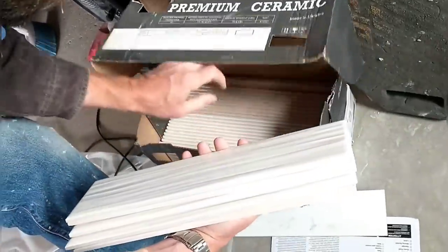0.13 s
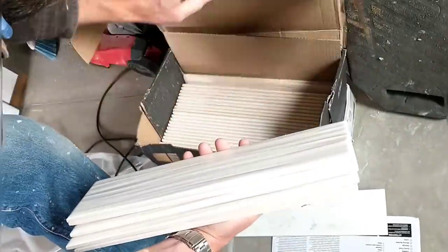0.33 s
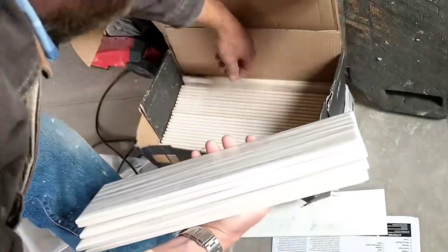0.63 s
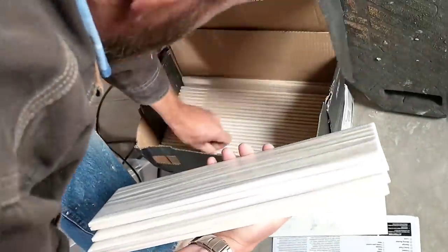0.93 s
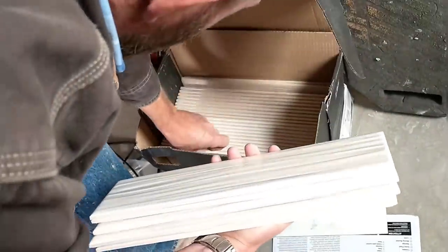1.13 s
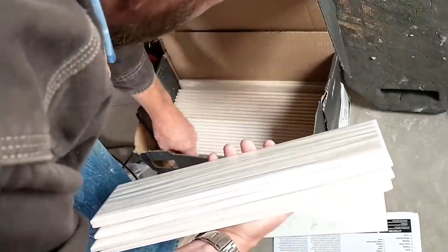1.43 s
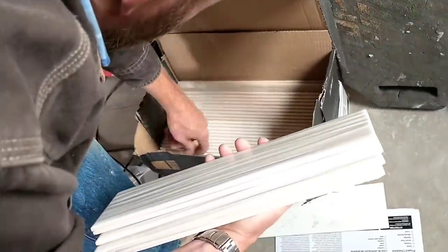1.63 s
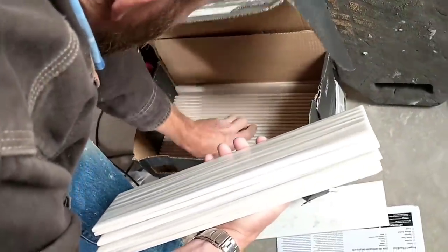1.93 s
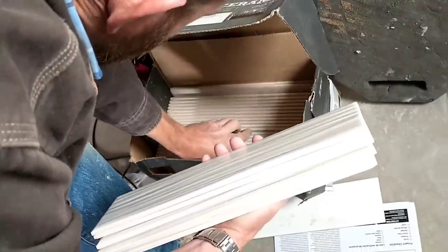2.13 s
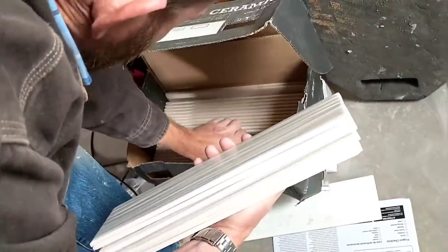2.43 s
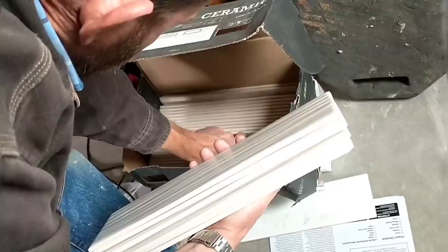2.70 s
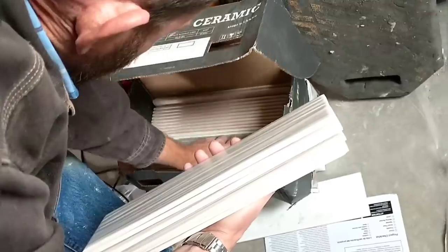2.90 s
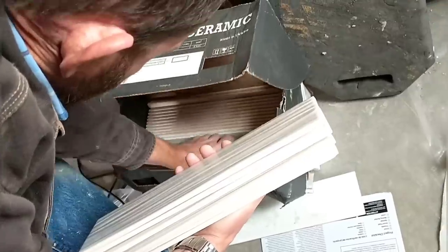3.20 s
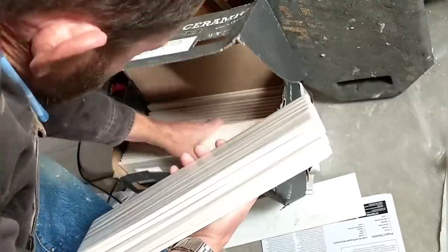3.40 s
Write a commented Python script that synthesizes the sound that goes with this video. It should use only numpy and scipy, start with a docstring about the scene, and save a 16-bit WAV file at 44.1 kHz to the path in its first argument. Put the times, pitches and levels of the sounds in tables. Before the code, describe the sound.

Stacked ceramic tiles clink and scrape close to the microphone in a quiet small room. A cardboard lid flips open and creaks, a sleeve brushes the box, then tile edges click before a bundle knocks and slides out grittily.

```python
"""Ceramic tiles are taken from a cardboard box in a small room with a faint hush.
First the lid flips open with a snap and its folds creak; a hand and sleeve brush and bump the hollow box.
From 2 s tile grinds on tile, and from 2.6 s the edges click and chatter, ringing the stack.
Near 3.2 s a bundle knocks against the stack, then slides out with a gritty, squeaking scrape."""
import sys
import numpy as np
from scipy import signal
from scipy.fft import rfft, irfft
from scipy.io import wavfile

SR = 44100
rng = np.random.default_rng(int(sys.argv[2]) if len(sys.argv) > 2 else 0)


def dump(signal):
    """Clip the signal to [-1, 1] and save it as 16-bit WAV at the path in sys.argv[1]."""
    limited = np.clip(np.atleast_2d(signal).T, -1, 1)
    pcm = np.round(limited * 32767).astype(np.int16)
    wavfile.write(sys.argv[1], SR, pcm)


N = 156555
T = np.arange(N) / SR


def from_db(db):
    """Decibels to gain."""
    return 10 ** (np.asarray(db) / 20)


def colour(x, points, tilt_db=0):
    """Minimum-phase filter from (Hz, dB) points plus a tilt per octave; unity noise gain."""
    hz, db = np.transpose(points)
    octaves = np.log2(np.maximum(np.fft.rfftfreq(8192, 1 / SR), 1))
    gain = from_db(np.interp(octaves, np.log2(hz), db) + tilt_db * np.maximum(octaves, np.log2(hz[0])))
    cepstrum = irfft(np.log(gain / np.sqrt(np.mean(gain ** 2))))
    half = len(cepstrum) // 2
    cepstrum[1:half] *= 2
    cepstrum[half + 1:] = 0
    response = irfft(np.exp(rfft(cepstrum)))[None, :half]
    return signal.fftconvolve(np.atleast_2d(x), response, axes=1)[:, :N]


def butter(x, hz, kind="low", order=2):
    """Butterworth low- or high-pass."""
    return signal.sosfilt(signal.butter(order, min(hz, SR / 2 - 1), kind, fs=SR, output="sos"), x)


def resonate(x, modes):
    """Parallel resonances; about unity noise gain."""
    out, power = 0, 0
    for hz, width_hz, db in modes:
        r = np.exp(-np.pi * width_hz / SR)
        b = from_db(db) * (1 - r * r) / 2
        poles = [1, -2 * r * np.cos(2 * np.pi * hz / SR), r * r]
        out = out + signal.lfilter([b, 0, -b], poles, x + 1e-18)
        power += from_db(db) ** 2 * (1 - r)
    return out / np.sqrt(power)


def spread(pair, split_hz=722, bass_side_db=-20):
    """Two unrelated signals to left and right: alike in the bass, unlike in the treble."""
    side = butter(pair[1], split_hz, "high") + from_db(bass_side_db) * butter(pair[1], split_hz, order=1)
    mid = pair[0] + (np.sqrt(2) - 1) * butter(pair[0], split_hz, order=1)
    return np.array([mid + side, mid - side]) / np.sqrt(2)


def grains(per_s, spread_db):
    """Random micro-contacts of uneven size; stereo, rms 1."""
    sizes = from_db(spread_db * np.minimum(rng.exponential(1, N), 4))
    pulses = (rng.random(N) < per_s / SR) * sizes * rng.choice([-1, 1], (2, N))
    stereo = spread(np.array([pulses[0], np.roll(pulses[1], 1)]))
    return stereo / stereo.std()


def friction(judder_hz=43.3, judder_db=2):
    """Two surfaces rub under wavering pressure; rms 1."""
    waver = butter(rng.standard_normal(N + SR), judder_hz)[SR:]
    rub = grains(per_s=6000, spread_db=3.2) * from_db(judder_db * waver / waver.std())
    return rub / rub.std()


def swell(start_s, rise_s, hold_s, fall_s, db):
    """Envelope of one movement: linear rise, hold, then -20 dB per fall_s."""
    falling_s = np.maximum(T - start_s - rise_s - hold_s, 0)
    return from_db(db - 20 * falling_s / fall_s) * np.clip((T - start_s) / rise_s, 0, 1)


def impulse(time_s, db):
    """One-sample blow."""
    return from_db(db) * (np.arange(N) == int(time_s * SR)) + 1e-18


def contact(time_s, db, decay_s, rise_s=0.00072, tick_db=4.5, crunch_db=1):
    """Two edges meet: a crunch builds to a sharp tick and dies away."""
    t = T[:SR // 8]
    burst = spread(rng.choice([-1., 1.], (2, len(t)))) * np.minimum(t / rise_s, 1) * np.exp(-t / decay_s)
    crunch = np.pad(burst, ((0, 0), (int(time_s * SR), N)))[:, :N]
    return impulse(time_s + rise_s, db + tick_db) + from_db(db + crunch_db) * crunch


# Room noise spectrum: (frequency [Hz], gain [dB])
HUSH_SPECTRUM = [(18, -29.5), (30, -0.5), (1220, -10), (3220, -19), (4300, -12), (7090, -19), (16000, -22)]


def hush(level_db=-70.5):
    """Steady, bass-heavy room noise."""
    noise = colour(spread(rng.standard_normal((2, N))), HUSH_SPECTRUM)
    return from_db(level_db) * butter(noise, 63.7, "high")


def room(x, low_t60_s=0.2884, treble_t60_s=0.2293, gap_s=0.003017, level_db=-2.5):
    """Dense reflections from floor and walls; the treble dies first."""
    t = T[:SR // 2]
    noise = spread(rng.standard_normal((2, len(t)))) * (t > gap_s)
    low = butter(noise, 3700, order=1)
    tail = low * from_db(-60 * t / low_t60_s) + (noise - low) * from_db(-60 * t / treble_t60_s)
    tail = butter(tail / np.sqrt(np.sum(tail ** 2) / 2), 253, "high")
    return from_db(level_db) * signal.fftconvolve(x, tail, axes=1)[:, :N]


# Hand, sleeve or bundle on the box:
# (time [s], rise [s], hold [s], 20 dB fall [s], boom [dB], rasp [dB], cloth [dB])
STROKES = [(0, 0.00156, 0.0395, 0.0679, -46, -51.5, -78.5), (0.107, 0.0161, 0.0196, 0.1174, -54, -54, -62),
           (0.247, 0.0178, 0.029, .3, -68.5, -69.5, -69.5),
           (0.418, 0.0448, 0.0124, 0.2748, -63.5, -73, -62.5),
           (0.579, 0.0082, 0.0683, 0.01, -50, -51, -57.5),
           (0.686, 0.01344, 0.0311, 0.0919, -41.5, -48.5, -52.5),
           (0.832, 0.0914, 0.131, 0.23, -60, -61, -61.5), (1.078, 0.0293, 0.0667, 0.282, -64, -68, -91.5),
           (1.54, 0.0324, .025, 0.0437, -55, -56, -57.5),
           (1.599, 0.0143, 0.0205, 0.1169, -49.5, -52.5, -62.5),
           (3.17, 0.034, 0.085, 0.11, -48.5, -51.5, -66.5)]
# Hand bumps: (time [s], level [dB])
BUMPS = [(.010, -13), (.417, -18.5), (.583, -18.5), (.678, -8), (.704, -5), (1.623, -11.5), (1.656, -18)]
# Hollow box: (frequency [Hz], width [Hz], gain [dB])
BOX_MODES = [(78.4, 8.34, -8), (120, 13.9, -9.5), (152.3, 11.9, 6), (198.5, 19.6, -11), (269.5, 38.2, -13),
             (337, 37.4, -12), (543.5, 76, -21.5)]
# Wall rasp and sleeve hiss: (frequency [Hz], gain [dB])
RASP_SPECTRUM = [(100, -12), (350, 0.5), (500, -1), (700, -1.5), (1000, -5.5), (1250, 2.5), (1550, -3.5),
                 (1900, -2.5), (2600, -13), (4300, -17.5), (7000, -26.5), (16000, -45)]
CLOTH_SPECTRUM = [(500, -21.5), (2500, -7), (4300, -2), (6500, -0.5), (9000, 1), (12000, 1), (14200, 3),
                  (16000, 2.5)]


def brushing(soft_hand_hz=166, radiation_hz=56.4):
    """Bumps and strokes boom in the box; strokes also rasp on its wall and hiss in the sleeve."""
    boom, rasp, cloth = (sum(swell(*row[:4], row[column]) for row in STROKES) for column in (4, 5, 6))
    bumps = butter(sum(impulse(*bump) for bump in BUMPS), soft_hand_hz)
    wall = resonate(bumps + boom * friction(), BOX_MODES)
    wall += colour(rasp * grains(per_s=6000, spread_db=3), RASP_SPECTRUM)
    sleeve = colour(cloth * grains(per_s=12000, spread_db=3.5), CLOTH_SPECTRUM)
    return butter(wall, radiation_hz, "high", order=4) + sleeve


# Cuff strokes: (time [s], rise [s], hold [s], 20 dB fall [s], level [dB])
CUFF_STROKES = [(0.691, 0.0097, 0.0147, .07, -54)]
# Cuff hiss: (frequency [Hz], gain [dB])
CUFF_SPECTRUM = [(2000, -30), (9000, -15.5), (12500, -4), (14500, 1), (16000, 3)]


def cuff():
    """The cuff whisks over the flap."""
    envelope = sum(swell(*stroke) for stroke in CUFF_STROKES)
    return colour(envelope * grains(per_s=12000, spread_db=3.5), CUFF_SPECTRUM)


# Fold creaks: (time [s], hold [s], frequency [Hz], width [Hz], level [dB], fade [dB/s])
CREAKS = [(0.0085, 0.083, 1629, 104, -54, 20), (0.1603, 0.27, 1656, 89, -54.5, 67.5),
          (.582, 0.069, 789, 34.4, -45, 80), (0.44, 0.0287, 672, 210, -61.5, 201)]


def creaks():
    """Cardboard folds creak: tiny slips drive one resonance each."""
    out = 0
    for time_s, hold_s, hz, width_hz, db, fade_db_per_s in CREAKS:
        fade = from_db(-fade_db_per_s * np.maximum(T - time_s, 0))
        envelope = swell(time_s, 0.0051, hold_s, 0.03, db) * fade
        out += resonate(envelope * grains(per_s=900, spread_db=1.5), [(hz, width_hz, 0)])
    return out


# Wall taps: (time [s], level [dB], decay [s], tilt [dB/octave])
TAPS = [(0.062, -45.5, .0033, -6.5), (1.433, -48.5, 0.0154, -1), (1.596, -54, 0.0143, 0.5),
        (1.621, -44, 0.0079, .5), (1.768, -52, 0.00207, -4), (2.333, -58.5, 0.0104, -1.5),
        (3.159, -35.5, .0057, -2)]
# Cardboard wall: (frequency [Hz], gain [dB])
WALL_SPECTRUM = [(100, -14), (300, -2.5), (700, -5), (1250, -1.5), (2200, -5), (4000, -4.5), (6000, -15),
                 (10000, -25.5), (16000, -41.5)]
BOX_HIGHPASS_HZ = 97.4


def taps():
    """Fingers and tiles tap the wall, which radiates little bass."""
    wall = sum(colour(contact(time_s, db, decay_s), WALL_SPECTRUM, tilt_db)
               for time_s, db, decay_s, tilt_db in TAPS)
    return butter(wall, BOX_HIGHPASS_HZ, "high")


# Lid snap, then a sharp tap, both ringing the lid: (time [s], ring [dB], decay [s], crack [dB])
LID_HITS = [(0.1124, -35.5, 0.00541, -38), (2.2075, -44.5, 0.00627, -48)]
# Lid ring: (frequency [Hz], width [Hz], gain [dB])
LID_MODES = [(615, 71, -8.5), (1160.5, 80, 3), (1570.5, 84, -0.5), (2071, 81.3, 0)]
# Card crack: (frequency [Hz], gain [dB])
CRACK_SPECTRUM = [(200, -8), (700, -4.5), (2800, -12), (4300, 3.5), (7000, 0.5), (10000, -0.5), (13000, -5),
                  (16000, -10.5)]


def lid_hits():
    """The card snaps, and is later tapped, each time with a bright crack that rings the lid."""
    out = 0
    for time_s, ring_db, decay_s, crack_db in LID_HITS:
        out += resonate(contact(time_s, ring_db, decay_s), LID_MODES)
        out += colour(contact(time_s, crack_db, decay_s), CRACK_SPECTRUM)
    return out


# Bundle on stack: (time [s], level [dB], hardness corner [Hz])
KNOCKS = [(3.163, -32.5, 1290), (3.167, -25, 421), (3.201, -33, 696), (3.221, -36.5, 700),
          (3.254, -37, 453), (3.281, -38.5, 276)]
# Dull ring of the stack: (frequency [Hz], gain [dB], T60 [s])
STACK_MODES = [(202.07, -11, 0.22), (252.8, -4, 0.11), (274.75, -2.5, 0.174), (323.1, -9, 0.15),
               (356.9, -12, 0.132), (391.2, -14, 0.134), (531.5, -7, 0.0812), (628.2, -6, 0.087),
               (658, -9, 0.075), (881.7, -4.5, 0.073), (1004.8, -2.5, 0.045), (1224.2, -5, 0.094)]


def knocks():
    """The heavy bundle drops against the stack and rocks to rest."""
    force = sum(butter(impulse(time_s, db), corner_hz) for time_s, db, corner_hz in KNOCKS)
    out = 0
    for hz, db, t60_s in STACK_MODES:
        r = from_db(-60 / (t60_s * SR))
        poles = [1, -2 * r * np.cos(2 * np.pi * hz / SR), r * r]
        out += from_db(db) * signal.lfilter([.5, 0, -.5], poles, force)
    return butter(out, BOX_HIGHPASS_HZ, "high", order=4)


# Coarse grit: (frequency [Hz], width [Hz], gain [dB])
GRIT_MODES = [(7500, 520, -1.5), (8534, 500, 0), (9665, 350, -1)]


def grit_ticks(envelope, level_db=-5.5):
    """Grains caught between the faces tick, independently for each mode."""
    ticks = sum(from_db(db) * resonate(envelope * grains(per_s=90, spread_db=2.5), [(hz, width_hz, 0)])
                for hz, width_hz, db in GRIT_MODES)
    return from_db(level_db) * ticks / np.sqrt(len(GRIT_MODES))


# Tile on tile: (time [s], grind [dB], grit [dB])
SLIDE = [(1.99, -81, -82.5), (2.1, -63, -71.5), (2.24, -61.5, -66.5), (2.48, -65.5, -67),
         (2.54, -73.5, -78.5), (2.76, -71.5, -74), (2.81, -54.5, -74), (2.89, -59.5, -69),
         (2.96, -48.5, -55), (3.03, -52.5, -62), (3.06, -48, -55), (3.145, -45.5, -51), (3.175, -42.5, -48),
         (3.26, -46, -49), (3.315, -47, -50.5), (3.335, -44, -46), (3.40, -47.5, -50.5), (3.445, -49, -50),
         (3.5, -45, -42.5), (3.55, -46, -43.5)]
# Grinding faces and fine dust: (frequency [Hz], gain [dB])
GRIND_SPECTRUM = [(40, -36), (90, -15.5), (160, 0.5), (380, -2), (520, -5.5), (750, -3), (1700, -2.5),
                  (2400, -5), (3300, -11.5), (5000, -14.5), (8000, -38.5), (16000, -59.5)]
DUST_SPECTRUM = [(1500, -27.5), (3500, -16), (5200, -2), (6500, -1.5), (8200, 0), (9500, 0.5),
                 (11200, -5.5), (14000, -5), (16000, -13.5)]


def scrape(rub, dust_db=-1.5):
    """Sliding faces grind; between them grit ticks and dust hisses."""
    times_s, grind_db, grit_db = np.transpose(SLIDE)
    grind, grit = (from_db(np.interp(T, times_s, db)) * (T > times_s[0]) for db in (grind_db, grit_db))
    ticks = grit_ticks(grit)
    dust = from_db(dust_db) * colour(grit * friction(), DUST_SPECTRUM)
    return colour(grind * rub, GRIND_SPECTRUM) + dust + ticks


# Catches of the bundle: (time [s], hold [s], frequency [Hz], width [Hz], level [dB])
SQUEAKS = [(3.323, 0.0192, 1810, 230, -45), (3.347, 0.0505, 1299, 110, -47), (3.391, 0.017, 1631, 120, -44),
           (3.395, 0.0199, 743, 50.3, -48.5), (3.467, 0.0183, 1257, 170, -42.5)]


def squeaks(rub):
    """The sliding bundle catches: friction drives a rough, narrow resonance."""
    return sum(resonate(swell(time_s, 0.00465, hold_s, 0.0184, db) * rub, [(hz, width_hz, 0)])
               for time_s, hold_s, hz, width_hz, db in SQUEAKS)


# Edge touches: (time [s], level [dB], decay [s], edge ring [Hz])
CLICKS = [(2.6278, -39, 0.00428, 4570), (2.7893, -34, 0.00372, 4940), (2.8165, -31, 0.00184, 4830),
          (2.917, -43.5, 0.00347, 4940), (2.9349, -39.5, .002, 4940), (2.951, -38.5, 0.0029, 5030),
          (2.963, -34, 0.0031, 5200), (2.971, -36, 0.00277, 5130), (3.005, -35.5, 0.00364, 5140),
          (3.0513, -29.5, 0.00292, 5140), (3.0733, -39.5, 0.00178, 5130), (3.102, -35, 0.00222, 4930),
          (3.1324, -38, 0.00204, 5110), (3.1726, -30.5, 0.0032, 5050), (3.185, -33.5, 0.00183, 5100),
          (3.2584, -36.5, 0.0022, 4510), (3.328, -35, 0.00315, 4370)]
# Stick-slip, starting partway into its fall: (time [s], rise [s], hold [s], 20 dB fall [s], level [dB])
CHATTER = (3, 0.01, -0.11, .4, -44)
# Bright ring of the stacked tiles: (frequency [Hz], width [Hz], gain [dB])
TILE_MODES = [(348.3, 115, -2), (564, 141, -4.5), (960, 150, -6), (1762, 150, 4), (2446, 317, -6),
              (3554, 540, -6.5), (4106, 160, -1.5), (4677, 368, -3.5), (5200, 290, -3), (5900, 103, -12.5),
              (8700, 640, -12), (9730, 244, -7.5)]


def clinks(edge_width_hz=370, edge_db=-5, stack_db=-0.5, ring_lowpass_hz=6510):
    """Touches ring edge and stack, chatter the stack only; a gentle low-pass softens both rings."""
    force = swell(*CHATTER) * grains(per_s=200, spread_db=4)
    edges = 0
    for time_s, db, decay_s, hz in CLICKS:
        touch = contact(time_s, db, decay_s)
        force += touch
        edges += resonate(touch, [(hz, edge_width_hz, 0)])
    ring = from_db(stack_db) * resonate(force, TILE_MODES) + from_db(edge_db) * edges
    return butter(ring, ring_lowpass_hz, order=1)


def tiles(left_lag_s=0.0001793):
    """Tiles ring and scrape; they lie nearer the right microphone, so the ring reaches the left later."""
    rub = friction()
    ring = clinks() + squeaks(rub)
    ring[0] = np.interp(T - left_lag_s, T, ring[0])
    return ring + scrape(rub)


def scene():
    """Tiles and box in the room, over its hush."""
    direct = tiles() + knocks() + lid_hits() + taps() + creaks() + brushing() + cuff()
    return direct + hush() + room(direct)


# Microphone responses: (frequency [Hz], left [dB], right [dB])
MIC_RESPONSES = [(291, 1, 2.5), (780, 2.5, 1), (1766, 1, 1.5), (2746, 2, 3), (4210, -3.5, 5.5),
                 (5050, -10, 5.5), (6360, -3, 3), (8270, 1.5, 2.5), (14100, 1.5, -0.5)]
CUTOFF_HZ = 15800


def record(dry):
    """Each microphone adds its colour; a steep low-pass cuts the top."""
    responses = np.array(MIC_RESPONSES)
    heard = np.vstack([colour(dry[channel], responses[:, [0, channel + 1]]) for channel in range(2)])
    return signal.sosfilt(signal.ellip(12, .1, 70, CUTOFF_HZ, fs=SR, output="sos"), heard)


dry = scene()
out = record(dry)
dump(out)
```